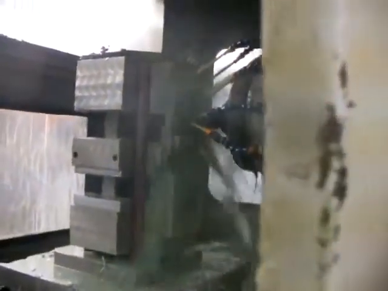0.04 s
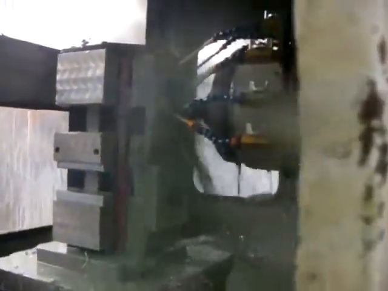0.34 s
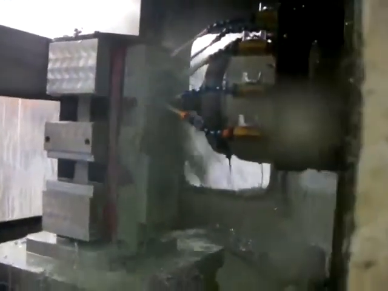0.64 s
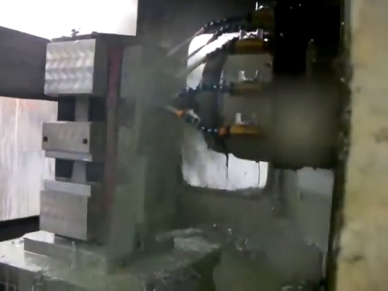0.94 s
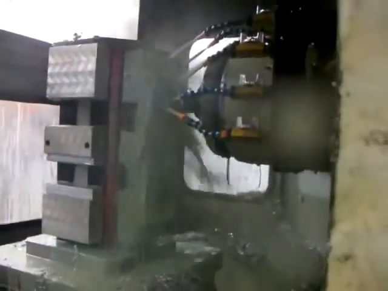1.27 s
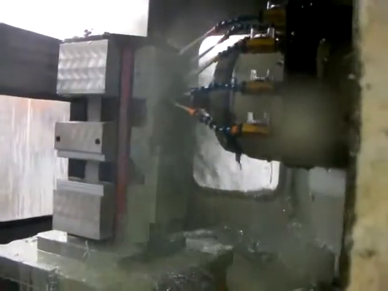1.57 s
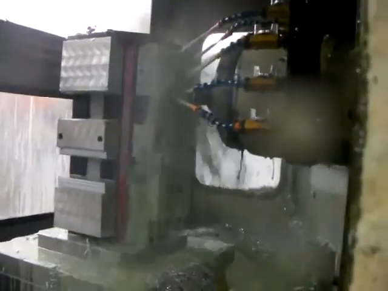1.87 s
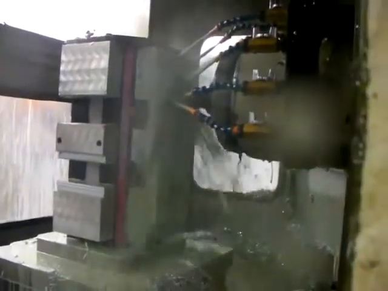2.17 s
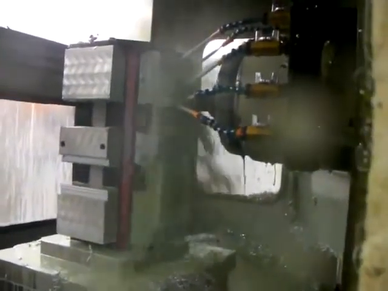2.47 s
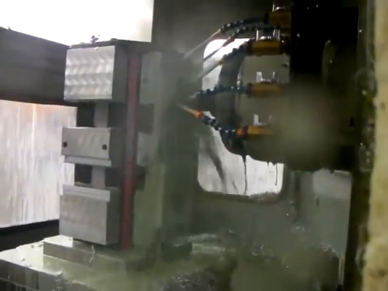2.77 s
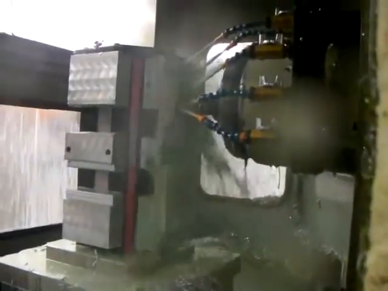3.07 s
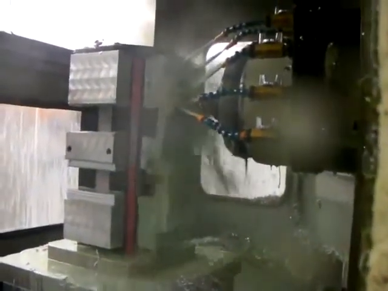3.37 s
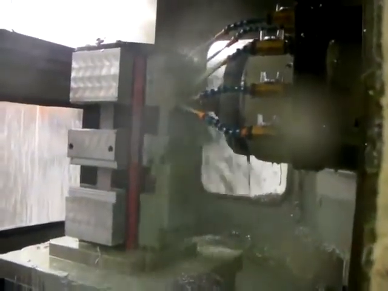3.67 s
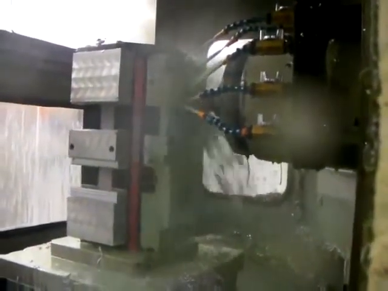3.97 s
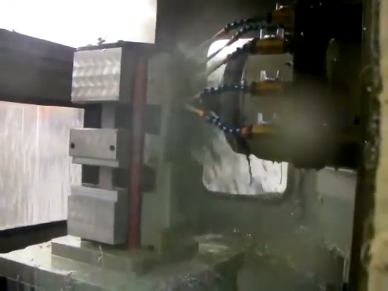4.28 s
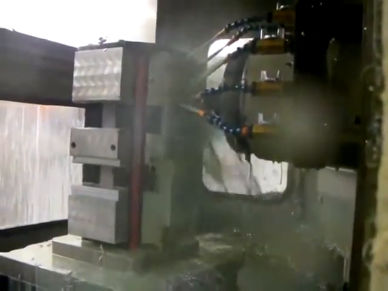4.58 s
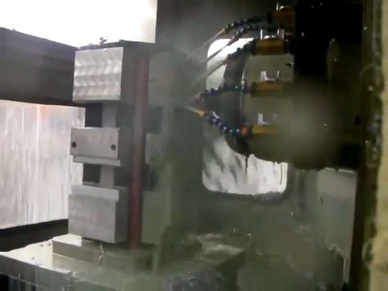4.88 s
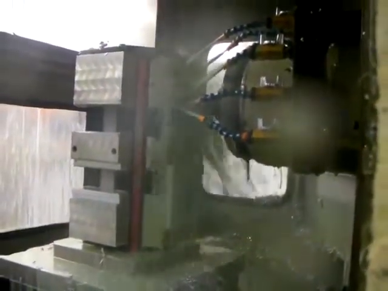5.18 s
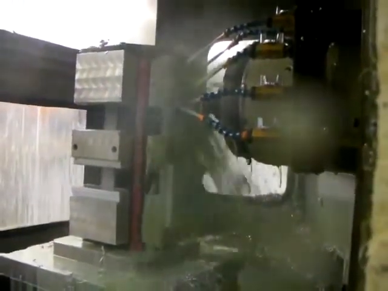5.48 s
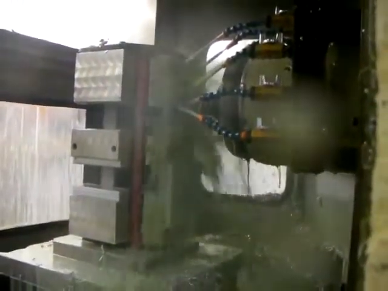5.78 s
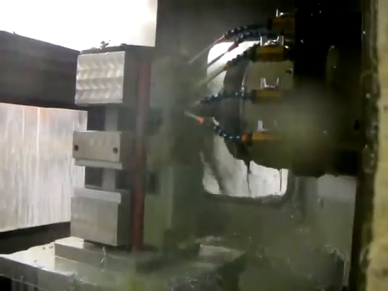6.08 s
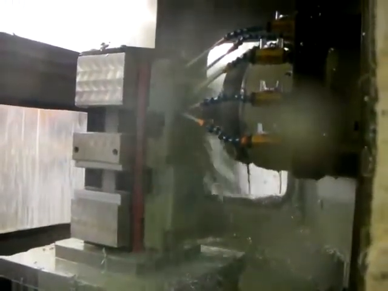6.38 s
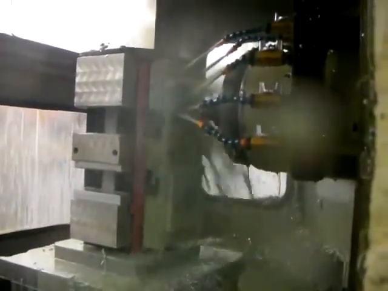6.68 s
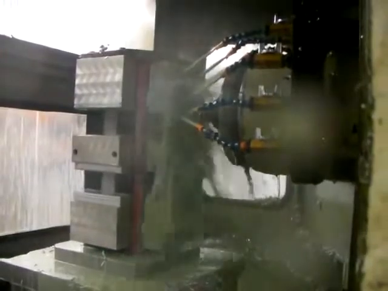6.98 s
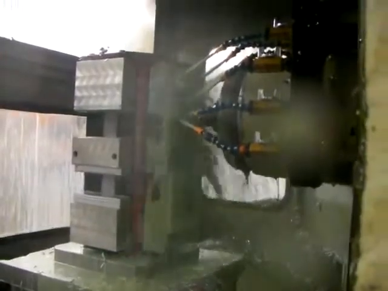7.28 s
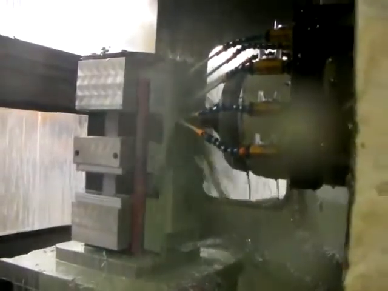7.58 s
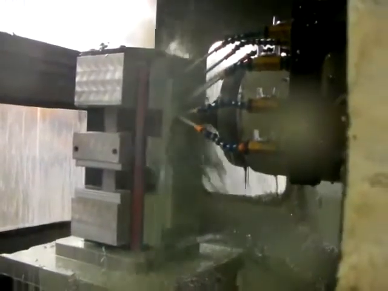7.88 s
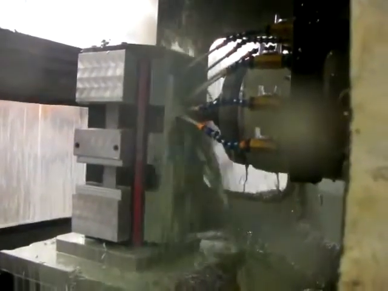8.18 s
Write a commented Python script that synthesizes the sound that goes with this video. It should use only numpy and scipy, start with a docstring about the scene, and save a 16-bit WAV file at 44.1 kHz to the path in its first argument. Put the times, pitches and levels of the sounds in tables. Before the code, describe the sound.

A milling machine cuts metal under jets of coolant: a constant wet hiss with a few wavering tones and occasional ticks.

```python
"""Flood coolant sprays over metal blocks in a milling machine, heard from its open door.
The jets hiss, drops spatter on the work and drum the sheet-metal enclosure into a roar.
Tearing chips keep the cutter ringing faintly; three spindle shafts sing at almost one pitch and beat.
An axis drive whines, pumps and motors hum, and a lumpy rumble sits underneath.
Now and then a large drop or chip ticks close to the door."""
import sys
import numpy as np
from scipy import signal
from scipy.fft import rfft, irfft, next_fast_len
from scipy.io import wavfile
from scipy.ndimage import uniform_filter1d, map_coordinates

SR = 44100
rng = np.random.default_rng(int(sys.argv[2]) if len(sys.argv) > 2 else 0)


def generate_wav(sig):
    """Save sig (samples, or channels by samples) to the path in sys.argv[1] as 16-bit PCM at SR."""
    pcm = np.round(np.clip(np.atleast_2d(sig).T, -1, 1) * 32767).astype(np.int16)
    wavfile.write(sys.argv[1], SR, pcm)


N = 363384

# how alike the enclosure leaves the two ears: freq_hz, correlation
EAR_LIKENESS = [(60, .86), (240, .9), (490, .93), (980, .87), (1450, .78), (2100, .86), (4000, .73),
                (6200, .48), (8000, .34)]
# coolant fader rides, before trim: time_s, roar_db, splash_db
COOLANT_RIDES = [(0, -36.5, -30), (.6, -38, -30.5), (1.0, -38.5, -30), (1.5, -37.5, -29), (2.1, -36, -29.5),
                 (2.7, -38, -30), (3.6, -37, -30), (4.3, -38.5, -30.2), (5.2, -38, -29.5), (6.2, -38, -30),
                 (7.2, -37.5, -30), (8.24, -37.5, -30)]
# tone colours of the enclosure's roar, the splash and the jets: freq_hz, gain_db
ROAR_EQ = [(20, -63), (70, -49.5), (130, -22), (185, -10.5), (245, -17), (300, -8), (410, -1.5), (510, 1.5),
           (740, -3.5), (870, -1), (1120, -3), (1450, -6.5), (2500, -12.5), (6000, -40)]
SPLASH_EQ = [(600, -39.5), (1500, -10.5), (2300, -5), (3400, -1), (4500, -0.5), (6000, -4), (8500, -14.5)]
JET_EQ = [(2000, -39), (3500, -18), (4600, -3), (5400, 0), (6200, 4), (7000, 4.5), (8500, -5.5)]
# fader ride of the cutter's ring, before trim: time_s, level_db
RING_RIDE = [(0, -48), (.8, -46), (1.4, -42.5), (2, -48), (4.5, -50), (5.3, -47), (5.6, -42.5), (6.25, -41),
             (6.7, -47), (8.24, -48)]
# resonances of cutter and workpiece: pitch_hz, width_hz, gain_db
CUTTER_MODES = [(3553, 12, 0), (3935, 30, -4.5)]
# shafts of the spindle and its drive: speed_hz, in_step_with_first_s
SPINDLE_SHAFTS = [(267.565, 0), (267.195, .846), (266.47, .2)]
# their overtones, at base level: harmonic, first_shaft_db, second_shaft_db, third_shaft_db
SHAFT_HARMONICS = [(1, -65, -63.5, -75), (2, -47, -47.7, -45.8), (3, -48.5, -64, -65),
                   (4, -55.5, -57.5, -56.5), (5, -55, -56.5, -57.5), (6, -59, -60.5, -60)]
# slow swell of the two strongest as the cut goes on: time_s, second_harmonic_db, third_harmonic_db
HARMONIC_SWELL = [(0, 0, -3), (0.38, 3, 0), (0.8, -1, 0), (1.4, 0.5, -3), (2, 1, 3), (2.8, -0.5, 1.5),
                  (3.3, 0, -1.5), (3.95, 3, 3), (4.4, -3.5, 1), (4.9, -3, 3.5), (5.6, -4.5, 1.5),
                  (6.2, 0, -1), (7.4, 1.5, -.5), (8.24, -1.5, -2)]
# fader rides of the axis drive's whine: time_s, fundamental_db, third_harmonic_db
DRIVE_RIDES = [(0.1, -44, -45.5), (0.7, -52, -56), (1.2, -49.5, -49), (2.05, -49.5, -46),
               (2.6, -53.5, -55.5), (3.1, -60.5, -60.5), (3.75, -62.0, -44.5), (4.5, -60.5, -51.5),
               (5.4, -49.5, -49), (6.1, -45, -44.5), (6.55, -50, -55), (7.2, -48, -44.5),
               (7.85, -41.5, -44), (8.2, -38, -47.5)]
# two coolant pumps: pitch_hz, in_step_with_first_s
PUMP_TONES = [(176.77, 0), (175.38, .6)]
# each pump's hum: level_db
PUMP_LEVELS = [-57.5, -65.5]
# other motors and humming panels: pitch_hz, level_db
HUM_TONES = [(163, -66), (300, -55), (313.5, -57), (526, -57.5), (583.5, -56.5), (617.5, -53.5),
             (1185, -56.5), (1403, -53.5), (1784, -63)]
# tone colour of the rumble: freq_hz, gain_db
RUMBLE_EQ = [(20, -22), (55, -12.5), (85, -4.5), (120, 1.5), (155, 2), (230, -12.5), (400, -31.5)]
# large drops and chips striking near the door, before trim: start_s, level_db
TICK_CUES = [(.213, -13), (.948, -11), (2.53, -10), (3.752, -11.5), (4.193, -14.5), (4.3585, -9),
             (5.8, -9.5), (6.217, -5), (6.7786, -10.5), (8.097, -11.5)]
# where the machine sits in the stereo image: freq_hz, right_lead_rad, left_minus_right_db
PLACEMENT = [(100, 0, 0.1), (550, 0.095, 0.1), (800, .11, -1.2), (1200, .13, 1), (2000, 0.14, 0.5),
             (2900, 0.31, 0), (4700, 0.48, -0.2), (7000, .6, 1), (7800, 0.96, 1)]
# treble roll-off with a notch and a last small lobe: freq_hz, gain_db
MASTER_EQ = [(7000, 0.5), (7450, -1), (7700, -6.5), (7820, -27), (7920, -54), (8040, -43.5), (8170, 1),
             (8290, -6.5), (8400, -39.5)]


def amp(db):
    """Decibels to gain."""
    return 10 ** (np.asarray(db) / 20)


def unit(x):
    """x at rms 1."""
    return x / np.sqrt(np.mean(x ** 2) + 1e-20)


def along(points, hz):
    """A (freq_hz, value) curve read on a log frequency axis."""
    freqs, values = np.transpose(points)
    return np.interp(np.log(hz + 1), np.log(freqs + 1), values)


def rides(rows):
    """One value per sample for each column after time_s."""
    times, *columns = np.transpose(rows)
    return [np.interp(np.arange(N) / SR, times, column) for column in columns]


def wobble(rate_hz):
    """A smooth random curve through rate_hz points a second."""
    knots = rng.standard_normal(int(N * rate_hz / SR) + 4)
    return map_coordinates(knots, [np.arange(N) * rate_hz / SR])


def filtered(x, response):
    """x through a filter given as gain against frequency."""
    size = next_fast_len(N + SR // 2)
    return irfft(rfft(x, size) * response(np.fft.rfftfreq(size, 1 / SR)), size)[..., :N]


def eq(points):
    """An EQ table as a filter response."""
    return lambda hz: amp(along(points, hz))


def rippled_eq(points, spacing_hz=18, depth_db=.85):
    """An EQ with the fine peaks and dips of the enclosure's standing waves."""
    ripple_db = depth_db * rng.standard_normal(SR // spacing_hz)
    ripple_hz = spacing_hz * np.arange(len(ripple_db))
    return lambda hz: amp(along(points, hz) + np.interp(hz, ripple_hz, ripple_db))


def patchy_noise(depth_db):
    """Two unrelated noises whose gain drifts in patches of time and frequency."""
    spectrum = signal.stft(rng.standard_normal((2, N)), nperseg=512)[2]
    patches = rng.standard_normal(spectrum.shape[1:])
    for axis in (0, 1):
        patches = uniform_filter1d(patches, size=12, axis=axis)
    return signal.istft(spectrum * amp(depth_db * unit(patches)), nperseg=512)[1][:, :N]


def enclosed(pair, colour):
    """The enclosure colours and spreads two unrelated signals: bass centred, treble wide; rms 1."""
    def response(hz):
        width = np.arccos(np.clip(along(EAR_LIKENESS, hz), -1, 1)) / 2
        return colour(hz) * np.array([np.cos(width), np.sin(width)])
    mid, side = filtered(pair, response)
    return unit(np.array([mid + side, mid - side]))


def rotation(hz, drift_hz):
    """Phase of a rotation whose speed wanders slightly."""
    return 2 * np.pi * np.cumsum(hz + drift_hz * wobble(4)) / SR


def slipping(rotors, drift_hz):
    """Phases of rotations that wander together and slip steadily past one another."""
    t = np.arange(N) / SR
    wander = rotation(0, drift_hz)
    first_hz = rotors[0][0]
    return [wander + 2 * np.pi * (hz * (t - in_step_s) + first_hz * in_step_s)
            for hz, in_step_s in rotors]


def tone(phase, level_db, waver_db):
    """A wavering sine; standing waves put it a little out of step between the ears."""
    offset_rad = 0.13 * wobble(1)
    peak = np.sqrt(2) * amp(level_db + waver_db * wobble(5))
    return peak * np.sin(phase + np.array([offset_rad, -offset_rad]))


def droplets(low_hz, high_hz, spread_db, decay_s):
    """Two unrelated streams of droplet pings, each at its own pitch: many small, a few larger."""
    count, ping_samples = 9000, 220
    t = np.arange(ping_samples) / SR
    streams = []
    for when, pitch, strength in rng.random((2, 3, count)):
        gain = amp(spread_db * np.minimum(-np.log(1 - strength), 3.5))
        hz = low_hz + (high_hz - low_hz) * pitch
        pings = gain[:, None] * np.sin(2 * np.pi * hz[:, None] * t) * t * np.exp(-t / decay_s)
        at = (when * N).astype(int)[:, None] + np.arange(ping_samples)
        streams.append(np.bincount(at.ravel(), pings.ravel(), N)[:N])
    return unit(np.array(streams))


def coolant(jet_db=-23, trim_db=3.0):
    """Jets atomise on the cutter, drops spatter on the work and drum on the enclosure."""
    roar_db, splash_db = (ride + trim_db for ride in rides(COOLANT_RIDES))
    surge_db = 0.5 * wobble(16) + 0.55 * wobble(60)  # the jets break up unevenly
    slosh_db = 0.3 * wobble(16)  # coolant is flung off the work in spurts
    roar = enclosed(patchy_noise(depth_db=1.5), eq(ROAR_EQ))
    spatter = droplets(low_hz=1202, high_hz=5480, spread_db=0.5, decay_s=0.00079)
    mist = droplets(low_hz=3990, high_hz=7840, spread_db=2.0, decay_s=0.00042)
    splash = enclosed(patchy_noise(depth_db=1.15) + 0.26 * spatter, rippled_eq(SPLASH_EQ))
    jet = enclosed(patchy_noise(depth_db=0.9) + 0.28 * mist, rippled_eq(JET_EQ))
    return (amp(roar_db) * roar
            + amp(splash_db + slosh_db) * splash
            + amp(jet_db + surge_db + slosh_db) * jet)


def cutter_ring(trim_db=2):
    """Chips tearing off keep the cutter and workpiece ringing."""
    def resonances(hz):
        return sum(amp(db) * 1j * hz * width / (pitch ** 2 - hz ** 2 + 1j * hz * width)
                   for pitch, width, db in CUTTER_MODES)
    ring_db, = rides(RING_RIDE)
    return amp(ring_db + trim_db) * enclosed(rng.standard_normal((2, N)), resonances)


def spindle_song():
    """Three shafts' harmonics beat as they slip past one another; tearing chips make them rasp."""
    phases = slipping(SPINDLE_SHAFTS, drift_hz=.15)
    swell_db = dict(zip((2, 3), rides(HARMONIC_SWELL)))
    rasp = amp(1.3 * wobble(45))
    return rasp * sum(tone(harmonic * phase, db + swell_db.get(harmonic, 0), waver_db=.5)
                      for harmonic, *levels in SHAFT_HARMONICS
                      for phase, db in zip(phases, levels))


def drive_whine(pitch_hz=399.9):
    """An axis drive whines on its fundamental and third harmonic, each swelling and fading."""
    fundamental_db, third_db = rides(DRIVE_RIDES)
    phase = rotation(pitch_hz, drift_hz=0.33)
    return tone(phase, fundamental_db, waver_db=1.0) + tone(3 * phase, third_db, waver_db=1.0)


def pump_hum():
    """Two coolant pumps run slightly out of tune, so their hums beat slowly."""
    phases = slipping(PUMP_TONES, drift_hz=.2)
    return sum(tone(phase, db, waver_db=3.2) for phase, db in zip(phases, PUMP_LEVELS))


def motor_hum():
    """Other motors and humming panels each hold one faint, wavering tone."""
    return sum(tone(rotation(hz, drift_hz=0.59), db, waver_db=3.0) for hz, db in HUM_TONES)


def rumble(level_db=-59):
    """A low bed that swells and drops out in soft, uneven lumps."""
    lumps_db = 3.5 * wobble(11) + 4 * wobble(20)
    per_ear_db = 1.6 * np.array([wobble(14), wobble(14)])
    bed = enclosed(rng.standard_normal((2, N)), eq(RUMBLE_EQ))
    return amp(level_db) * unit(amp(lumps_db + per_ear_db) * bed)


def ticks(decay_s=0.00049, trim_db=-3.5):
    """Single large drops and chips strike near the door, each a short bright burst."""
    t = np.arange(N) / SR
    envelope = np.zeros(N)
    for start_s, level_db in TICK_CUES:
        start = round(start_s * SR)
        envelope[start:] += amp(level_db + trim_db) * np.exp(-t[:N - start] / decay_s)
    return envelope * enclosed(rng.standard_normal((2, N)), eq(JET_EQ))


def scene():
    """The whole machine as it reaches the two ears through the doorway."""
    def doorway(hz):
        placement, half = np.array(PLACEMENT), np.array([[.5], [-.5]])  # each ear takes half
        lead_rad = along(placement[:, [0, 1]], hz)
        balance_db = along(placement[:, [0, 2]], hz)
        return np.exp(-1j * half * lead_rad) * amp(half * balance_db)
    milling = coolant() + ticks() + cutter_ring() + spindle_song()
    underneath = drive_whine() + pump_hum() + motor_hum() + rumble()
    return filtered(milling + underneath, doorway)


def record(dry):
    """Master EQ: a notched treble roll-off, then silence above the cutoff."""
    cutoff_hz = 8549
    return filtered(dry, lambda hz: amp(along(MASTER_EQ, hz)) * (hz < cutoff_hz))


dry = scene()
out = record(dry)
generate_wav(out)
```